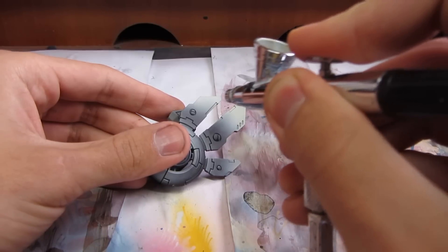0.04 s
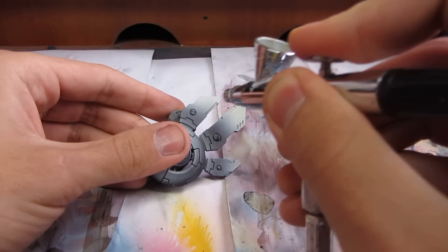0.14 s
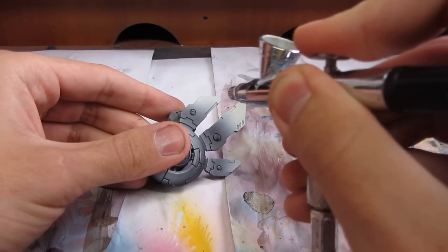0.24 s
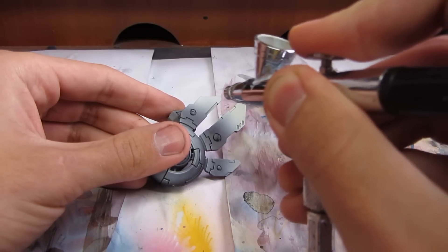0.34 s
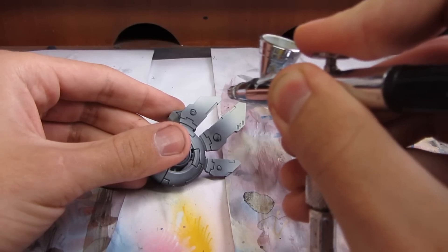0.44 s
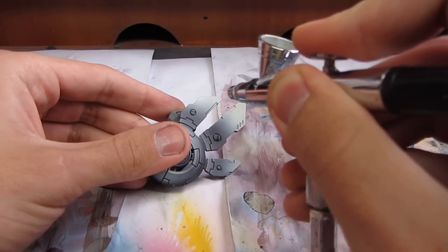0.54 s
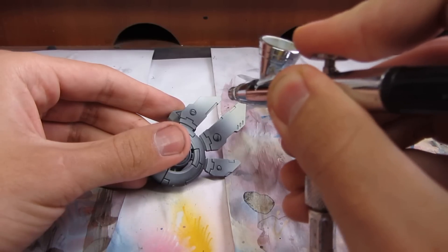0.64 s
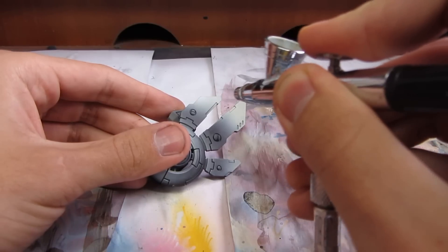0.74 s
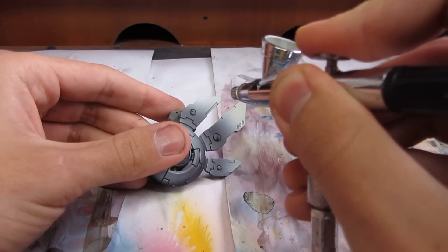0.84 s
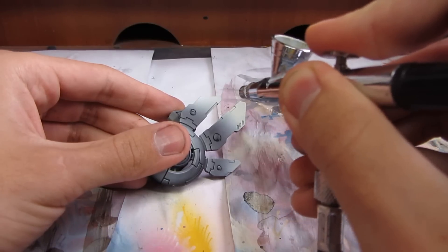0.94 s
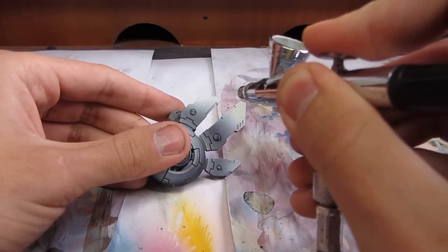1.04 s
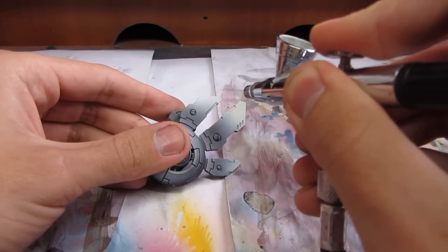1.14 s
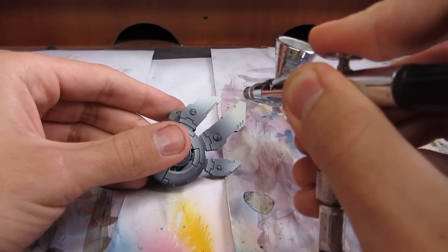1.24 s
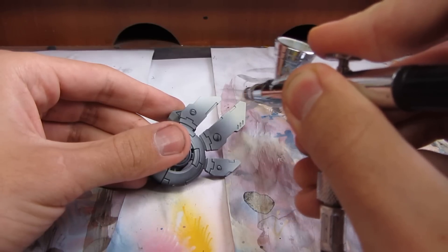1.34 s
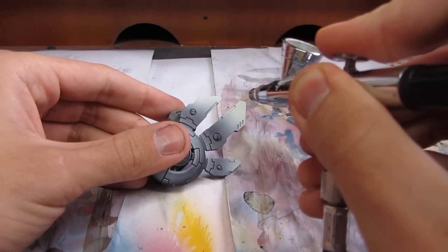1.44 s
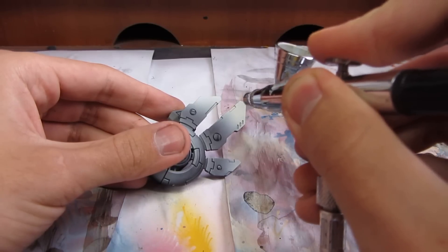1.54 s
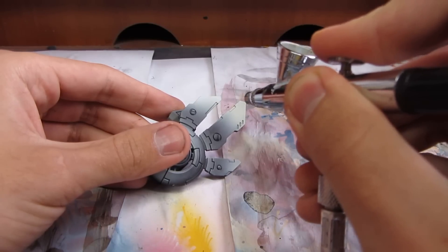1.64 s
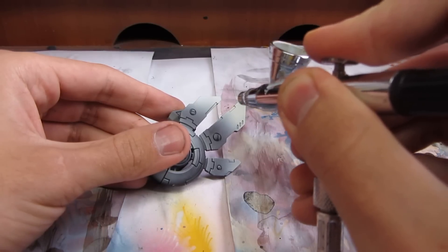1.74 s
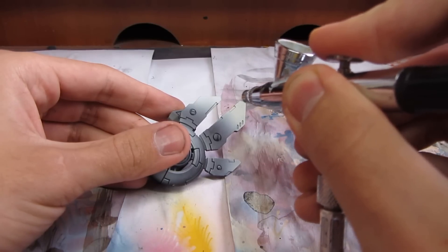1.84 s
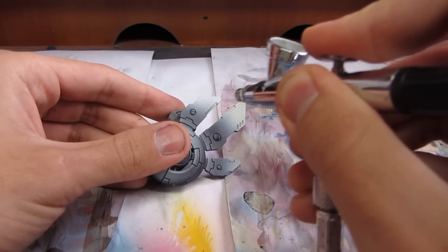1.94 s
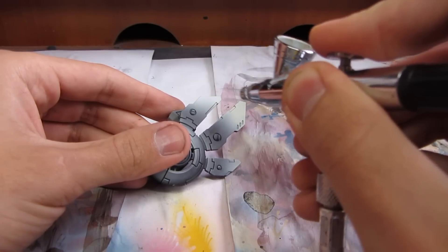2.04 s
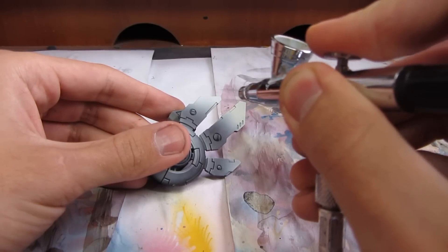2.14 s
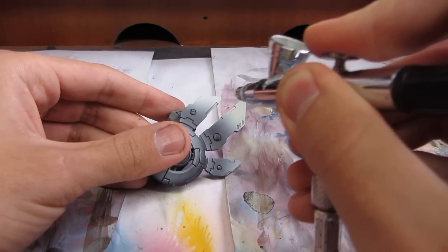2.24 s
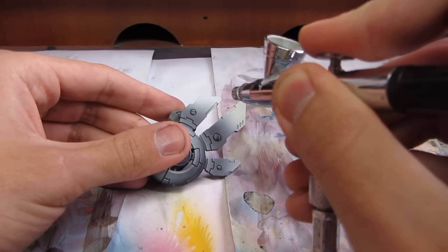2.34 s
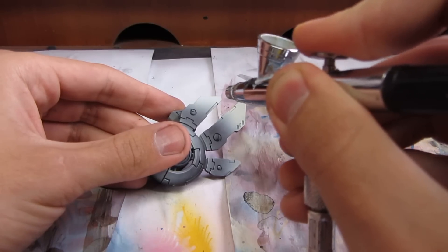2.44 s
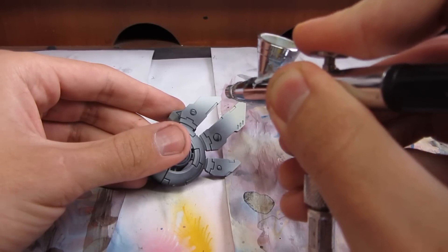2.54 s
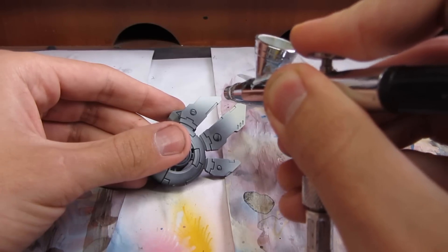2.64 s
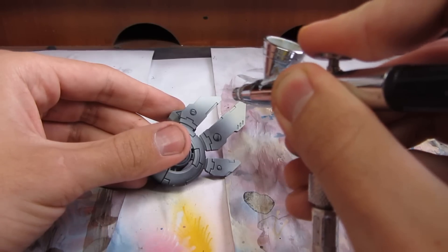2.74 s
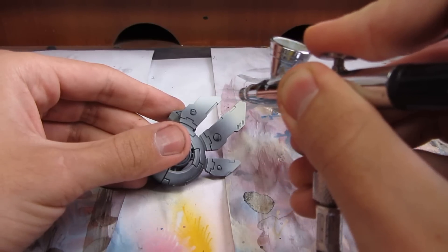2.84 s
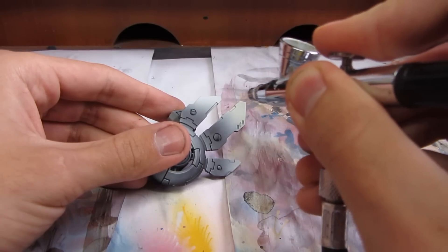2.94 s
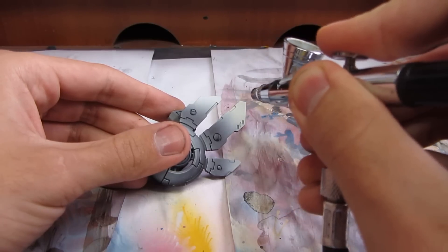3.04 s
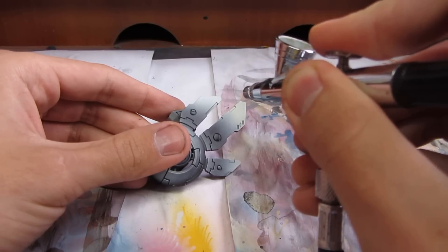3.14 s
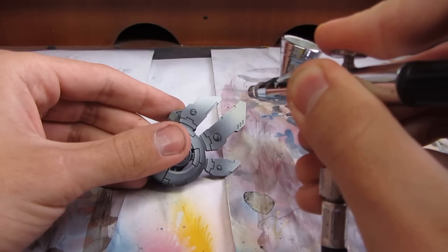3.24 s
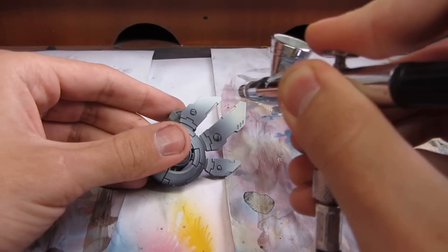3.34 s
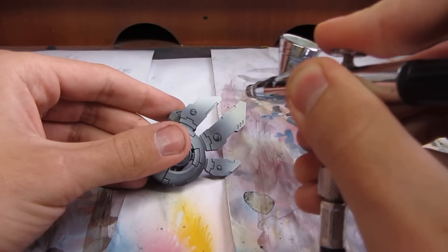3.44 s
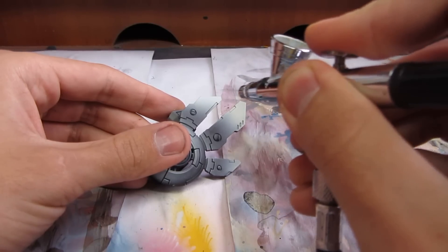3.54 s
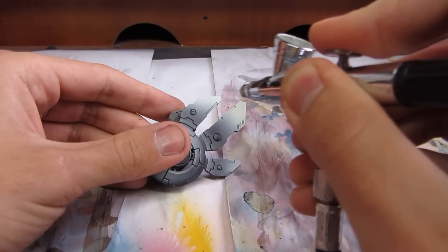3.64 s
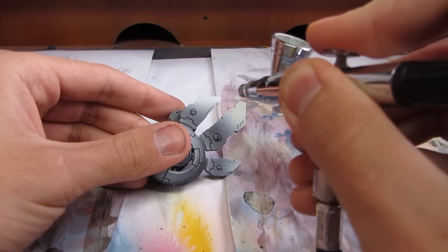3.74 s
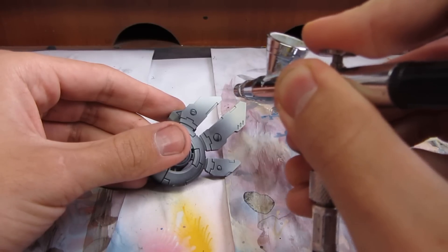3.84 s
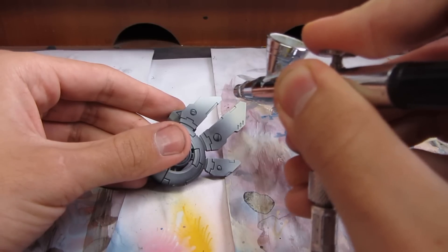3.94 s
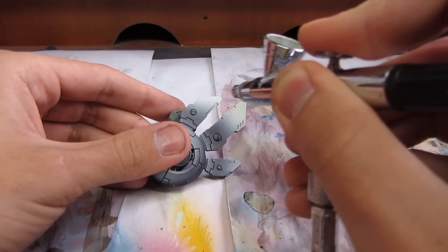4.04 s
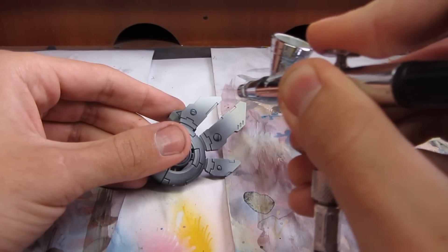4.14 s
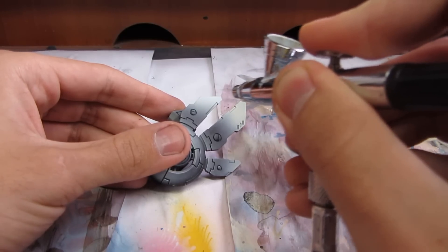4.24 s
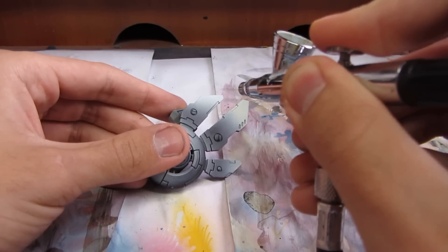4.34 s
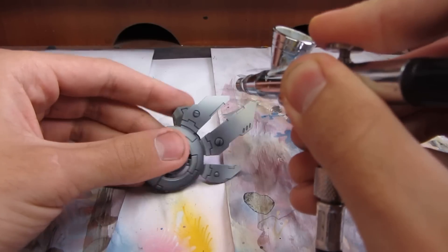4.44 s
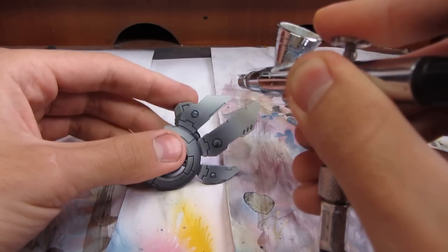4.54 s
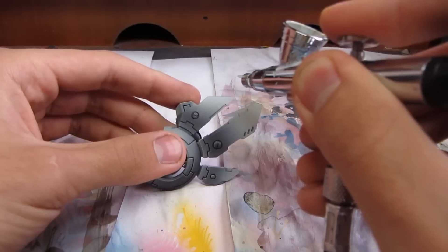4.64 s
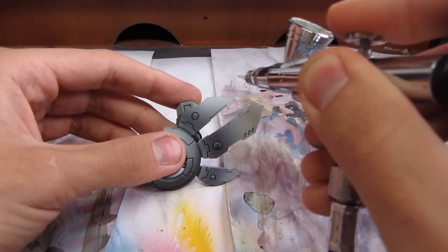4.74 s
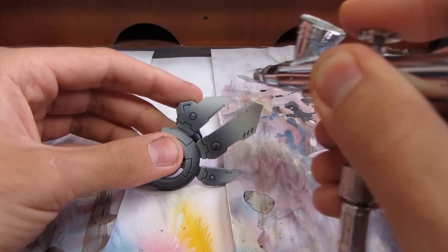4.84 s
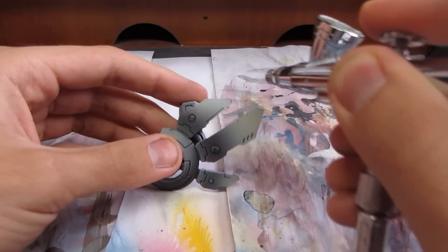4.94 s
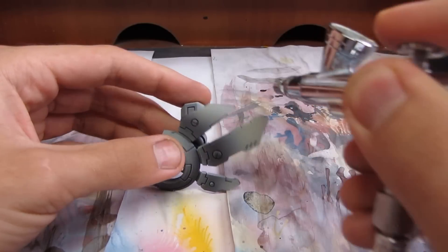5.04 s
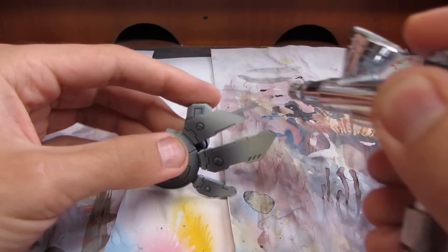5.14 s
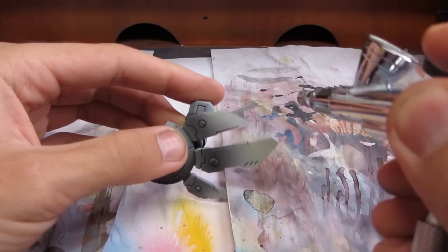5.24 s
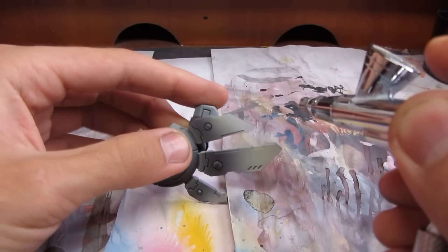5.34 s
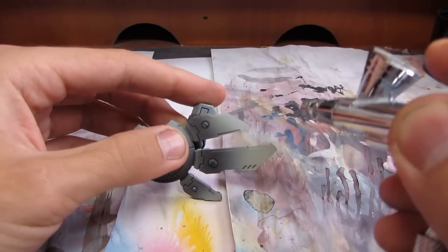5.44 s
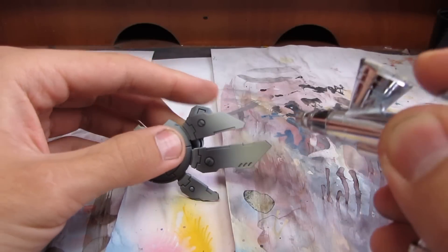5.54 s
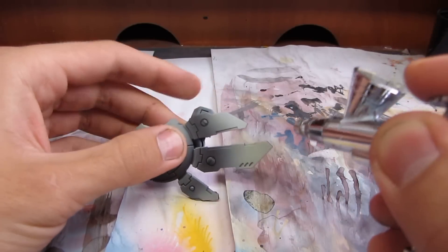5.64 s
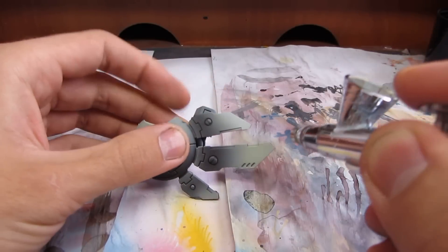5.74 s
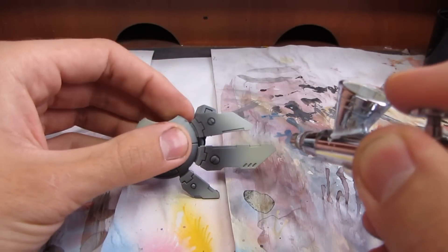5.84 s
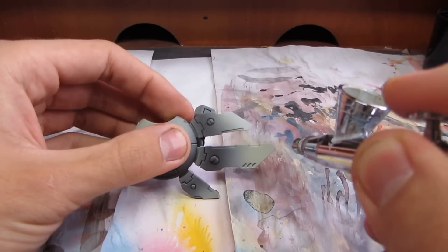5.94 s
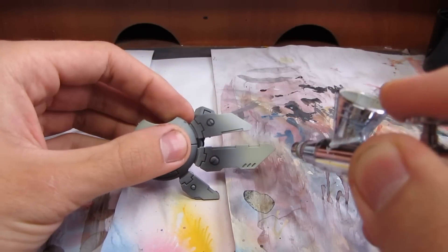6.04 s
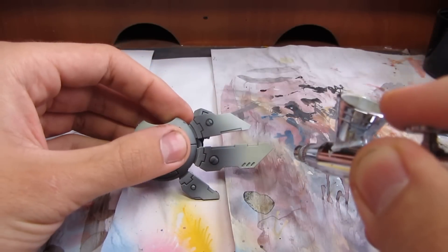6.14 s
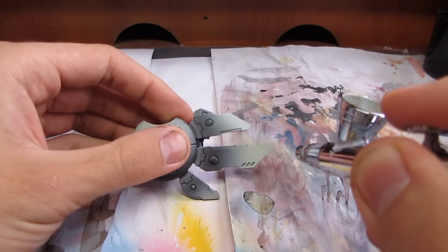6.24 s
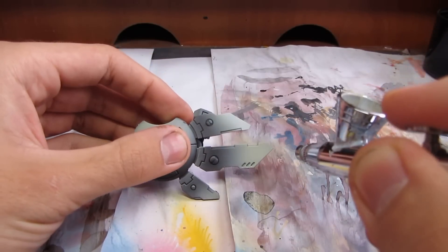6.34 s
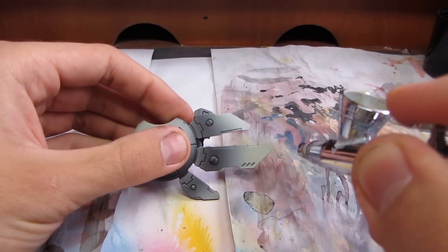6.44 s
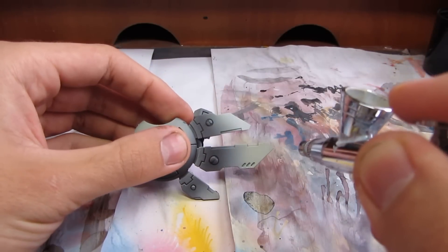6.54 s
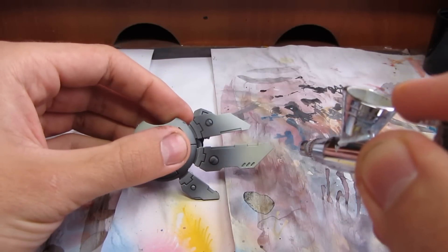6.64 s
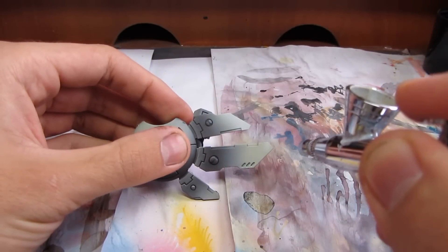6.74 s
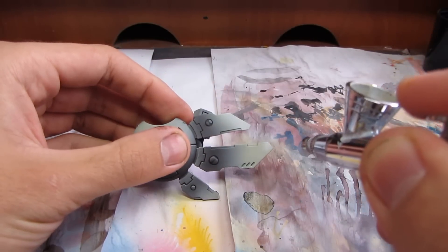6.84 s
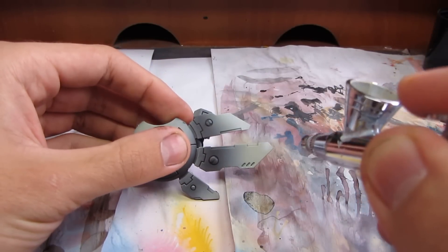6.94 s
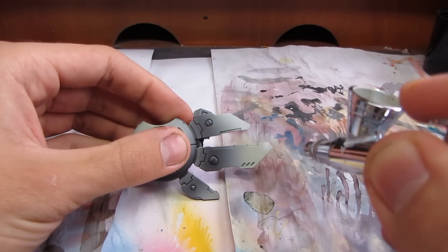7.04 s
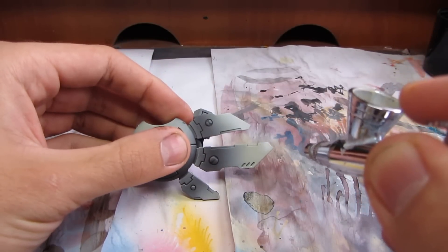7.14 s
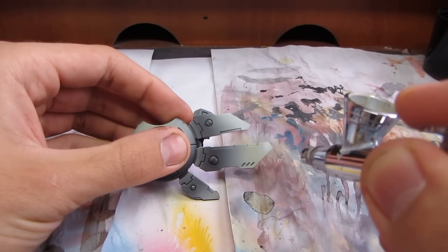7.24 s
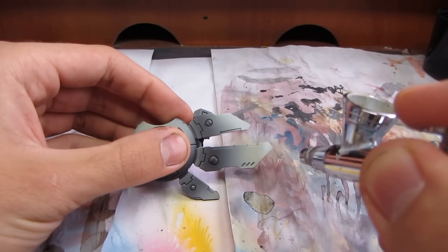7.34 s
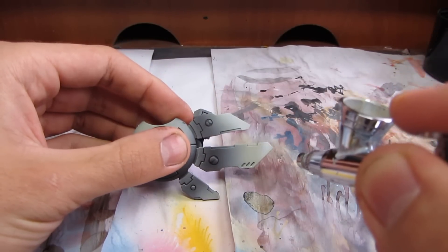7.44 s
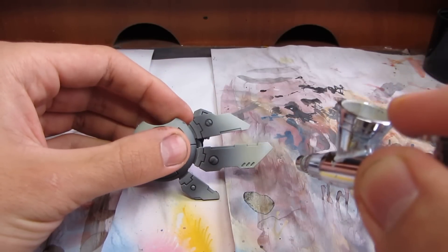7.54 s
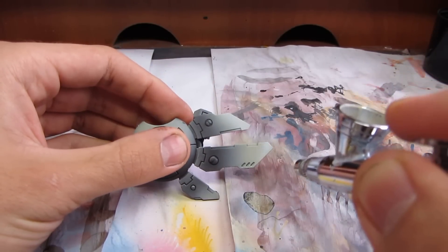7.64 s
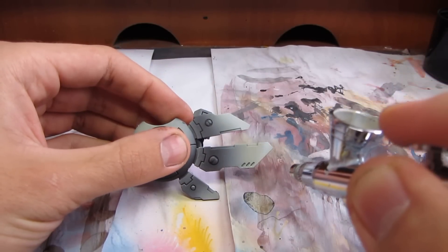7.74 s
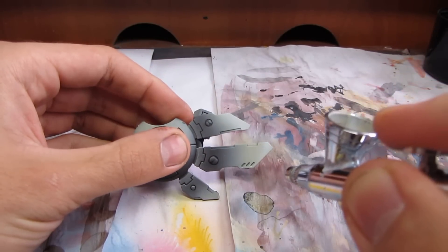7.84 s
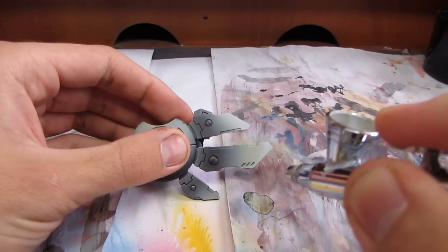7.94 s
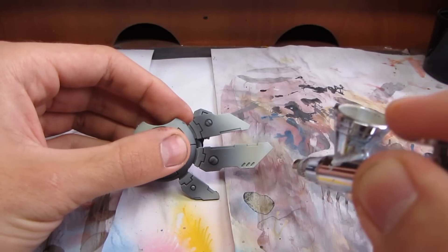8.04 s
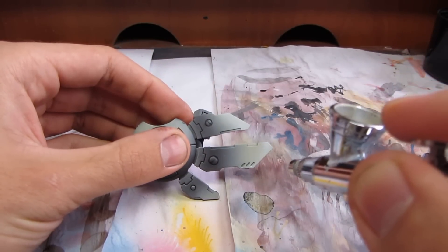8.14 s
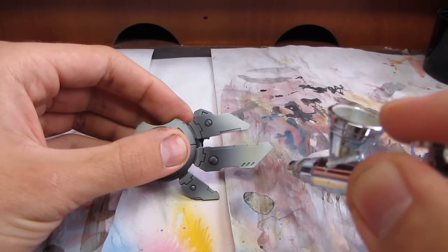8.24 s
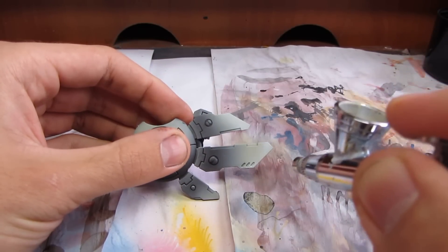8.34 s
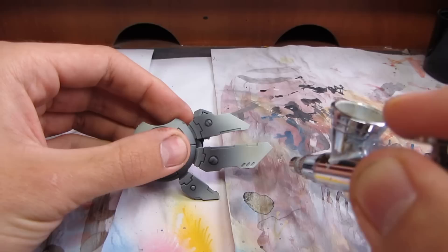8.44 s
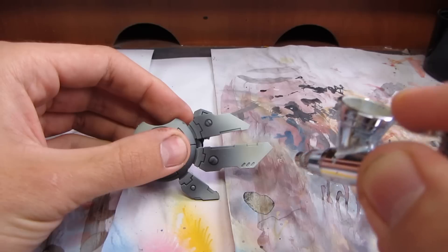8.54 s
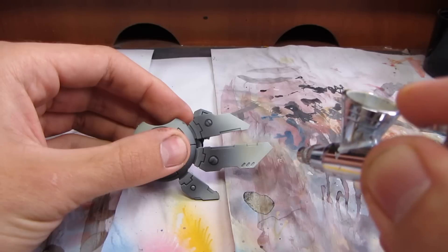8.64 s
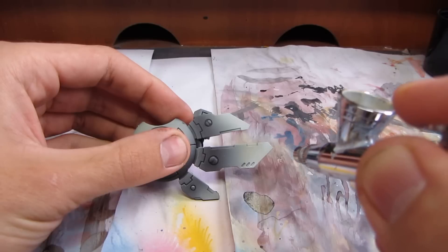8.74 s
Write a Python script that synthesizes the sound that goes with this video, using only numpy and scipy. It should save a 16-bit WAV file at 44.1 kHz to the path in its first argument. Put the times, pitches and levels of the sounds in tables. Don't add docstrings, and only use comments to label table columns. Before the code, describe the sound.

Two long bursts of sharp, unsteady compressed-air spray, split by a short quiet pause with faint handling rustles, nail ticks and low room hum.

```python
import sys
import numpy as np
from scipy import signal
from scipy.fft import rfft, irfft, next_fast_len
from scipy.io import wavfile
from scipy.ndimage import uniform_filter1d

SR = 44100
rng = np.random.default_rng(int(sys.argv[2]) if len(sys.argv) > 2 else 0)


def amp(db):
    return 10 ** (np.asarray(db, float) / 20)


def write(x):
    x = np.atleast_2d(x).T
    wavfile.write(sys.argv[1], SR, np.round(np.clip(x, -1, 1) * 32767).astype(np.int16))


N = 387638
T = np.arange(N) / SR
M = next_fast_len(N)
HZ = np.maximum(np.fft.rfftfreq(M, 1 / SR), 1)


def read(table, hz):
    table = np.array(table)
    return np.interp(np.log(hz), np.log(table[:, 0]), table[:, 1])


def unit(x):
    return x / np.sqrt(np.mean(x ** 2))


def walk(rate):
    k = int(SR / rate)
    steps = np.repeat(rng.standard_normal(N // k + 1), k)
    return unit(uniform_filter1d(uniform_filter1d(steps, k), k)[:N])


def bumps(s, length):
    return np.exp(-(2 * (T - s[:, None]) / length[:, None]) ** 2)


def causal(db, size=2048):
    cepstrum = irfft(np.log(amp(db)), size)
    cepstrum[..., 1:size // 2] *= 2
    cepstrum[..., size // 2 + 1:] = 0
    return irfft(np.exp(rfft(cepstrum)), size)


# frequency in Hz, level in dB per Hz.
JET_COLOUR = [
    [(150.0, -32.3), (300.0, -27.2), (600.0, -19.5), (1000.0, -14.4), (1500.0, -4.6), (2500.0, 0.0),
     (4000.0, -17.6), (6000.0, -8.4), (8500.0, -23.3), (11000.0, -19.9), (12500.0, -28.6), (15700.0, -23.4)],
    [(150.0, -30.9), (300.0, -21.8), (600.0, -18.5), (1000.0, -14.7), (1500.0, -0.3), (2500.0, -7.4),
     (4000.0, -7.6), (6000.0, 0.0), (8500.0, -18.5), (11000.0, -27.4), (12500.0, -31.4), (15700.0, -26.9)],
]
# centre in Hz, width in Hz, peak or notch in dB, left minus right in dB.
FIRST_REFLECTIONS = [(330.0, 90.0, -1.5, -1.4), (760.0, 90.0, -0.2, -3.3), (1060.0, 170.0, -3.9, 5.7),
                     (1150.0, 140.0, -5.9, -6.8), (1800.0, 180.0, 3.1, 7.2), (1910.0, 580.0, -14.5, -4.5),
                     (1895.0, 70.0, -6.0, 0.0), (2290.0, 170.0, 1.5, 0.0), (2560.0, 290.0, -8.2, -3.8),
                     (2880.0, 160.0, -5.2, -0.0), (3180.0, 100.0, -0.8, -6.0), (3580.0, 300.0, 5.0, 3.4),
                     (4160.0, 110.0, -0.8, 5.1), (4630.0, 370.0, 5.6, 2.3), (5120.0, 900.0, -13.2, -1.7),
                     (5440.0, 360.0, 6.9, 4.2), (5810.0, 390.0, -14.3, -0.1), (6620.0, 130.0, -1.6, 3.5),
                     (6920.0, 220.0, -3.5, -1.9), (8350.0, 800.0, 8.6, -3.4), (9350.0, 900.0, 5.2, 4.3),
                     (10010.0, 310.0, 4.2, 0.8), (11750.0, 650.0, -6.7, 2.1), (15490.0, 370.0, -11.1, 11.9)]
# centre in Hz, width in Hz, height in dB, left minus right in dB.
TURNED_REFLECTIONS = [(320.0, 210.0, -6.3, -1.7), (1070.0, 230.0, -15.9, 10.7), (1110.0, 340.0, 8.8, -11.3),
                      (1350.0, 150.0, 1.2, 0.0), (1690.0, 410.0, -15.9, 9.0), (1700.0, 90.0, -4.0, 0.0),
                      (1790.0, 170.0, 2.3, -10.0), (1920.0, 150.0, 2.3, 7.5), (1980.0, 610.0, -3.2, -11.9),
                      (2680.0, 360.0, -3.8, 5.8), (3030.0, 230.0, 2.1, 0.8), (3240.0, 190.0, -3.1, 3.2),
                      (3620.0, 460.0, -4.6, -4.2), (4240.0, 250.0, -1.1, -9.0), (4410.0, 900.0, -11.0, 3.5),
                      (5290.0, 490.0, -8.8, 11.4), (5480.0, 710.0, -6.8, -11.4),
                      (5930.0, 310.0, -15.9, 11.9), (6200.0, 400.0, -9.9, -1.7),
                      (6870.0, 640.0, -11.3, 3.9), (7610.0, 610.0, -4.2, 1.6), (9370.0, 160.0, -5.2, -7.2),
                      (13580.0, 900.0, 6.2, -1.5), (15550.0, 780.0, -9.7, -11.9)]
RIGHT_LEAD_US = [-2, 15]


def paths(pose):
    hz = np.maximum(np.fft.rfftfreq(2048, 1 / SR), 1)
    reflections = (FIRST_REFLECTIONS, TURNED_REFLECTIONS)[pose]
    centre, width, db, pan_db = np.transpose(reflections)
    shape = 1 / (1 + (2 * (hz[:, None] - centre) / width) ** 2)
    colour = read(JET_COLOUR[pose], hz)
    both = np.array([colour + shape @ (db + side * pan_db / 2) for side in (1, -1)])
    lead = np.exp(np.array([[-1j], [1j]]) * np.pi * HZ * RIGHT_LEAD_US[pose] / 10 ** 6)
    return rfft(causal(both), M) * lead


# frequency in Hz, level in dB per Hz.
SCATTER = [
    [(300.0, -34.1), (600.0, -35.9), (1000.0, -30.5), (1550.0, -32.8), (2000.0, -23.1), (2900.0, -23.3),
     (3900.0, -25.6), (5000.0, -24.5), (6300.0, -20.9), (7300.0, -23.5), (8600.0, -24.0), (10500.0, -26.8),
     (12500.0, -30.3), (15700.0, -29.7)],
    [(300.0, -34.6), (600.0, -37.0), (1000.0, -31.6), (1550.0, -28.8), (2000.0, -24.1), (2900.0, -24.2),
     (3900.0, -27.6), (5000.0, -24.4), (6300.0, -23.9), (7300.0, -23.7), (8600.0, -24.5), (10500.0, -27.8),
     (12500.0, -31.6), (15700.0, -32.9)],
]
# centre in Hz, width in Hz.
HAND_NOTCHES = [
    [(4920, 380), (5770, 320)],
    [(5250, 300), (5900, 200)],
]


def turbulence(pose, shadow):
    direct = rfft(rng.standard_normal(M)) * paths(pose)
    jet = direct + rfft(rng.standard_normal((2, M))) * amp(read(SCATTER[pose], HZ))
    shaded = sum(np.exp(-(2 * (HZ - hz) / width) ** 2) for hz, width in HAND_NOTCHES[pose])
    jet = jet - rfft(shadow * irfft(jet * shaded, M)[:, :N], M)
    return jet / np.sqrt(1 + (230 / HZ) ** 4)


# centre in seconds, change in dB, length in seconds.
SLIPS = [(0, -1.5, .06), (.06, 2.2, .07), (.155, -2, .11), (.27, 1.2, .05), (1.24, -1.5, .08),
         (1.4, 1, .08), (1.5, -6.5, .13), (2.44, 1.2, .1), (2.67, -2, .07), (2.73, 1.2, .05),
         (2.83, 1.5, .06), (3.08, -6.5, .14), (3.16, -4, .09), (3.32, -5, .08), (3.52, -3, .07),
         (3.59, 1.5, .06), (4.08, 1.2, .08), (4.31, 1.5, .07), (4.4, -1.2, .06), (6.61, 1.2, .06),
         (6.82, -1.5, .1), (6.95, 1.2, .06), (7.02, -2, .06), (7.19, -1.5, .1), (8.3, 1.2, .08),
         (8.46, -1.3, .07), (8.7, -1.2, .07)]


def aim():
    s, db, length = np.transpose(SLIPS)
    return db @ bumps(s, length)


# opens in seconds, rise in seconds, shuts in seconds, fall in seconds.
VALVE = [
    (-1, .002, 4.638, .0037),
    (6.216, .0013, 10, .004),
]
# time in seconds, air flow in dB, lean towards the desk in dB,
# turn towards the camera in dB, hand shadow from -1 to 1.
HANDS = [
    [(0, -.6, 3.3, .3, .65), (1.2, -.5, -2, .3, .1), (1.6, .3, -2.5, .8, -.9), (2.07, .4, 1, .5, .25),
     (2.7, 0, 3.5, -.9, .45), (2.86, .8, 0, -.1, .3), (3.1, -.5, -2, -1.6, .1), (3.25, -.4, -1.8, .6, .1),
     (4.45, .2, .8, .3, .55)],
    [(6.23, 1.2, 0, -.3, -.3), (6.6, .8, -1, -1.5, -.4), (6.75, -1.5, 0, -.6, -.2),
     (7.08, -1.6, .5, -1.7, -.1), (7.55, .8, -.5, 1.1, -.4), (7.82, -.5, -2, .6, .4), (8.3, 0, 1.5, 0, .45),
     (8.6, .2, 3, 0, .6), (8.79, 0, 4.5, -.8, .3)],
]
# lowest in Hz, highest in Hz.
REGIONS_HZ = [
    (350, 1000),
    (1100, 4000),
    (4500, 10500),
    (12000, 15500),
]
# desk wash, part splash, edge hiss, nozzle hiss in dB.
REGION_DB = [
    (-35, -19.9, -21.3, -33.7),
    (-34, -19, -22.8, -34.6),
]
FEELS_SLIP = (.45, 1.05, .95, .3)
FEELS_LEAN = (1.05, .1, -.15, .02)
FEELS_TURN = (0, -.25, 1.05, .5)


def burst(pose, slip, flicker_db=.6, flicker_rate=20):
    opens, rise, shuts, fall = VALVE[pose]
    when, *drifts = np.transpose(HANDS[pose])
    flow, lean, turn, shadow = (np.interp(T, when, drift) for drift in drifts)
    ease = np.clip(1 - (shuts - T) / .2, 0, 1)
    ease_db = (-1, -8, -6.5, -.2)
    jet = turbulence(pose, shadow - 2.2 * ease)
    power = np.abs(jet.mean(0)) ** 2
    out = 0
    for k, (lo, hi) in enumerate(REGIONS_HZ):
        corners = [(hz, float(j == k)) for j, pair in enumerate(REGIONS_HZ) for hz in pair]
        share = read(corners, HZ)
        inside = np.sqrt(2 * np.sum(power[(HZ > lo) & (HZ < hi)]) / M / N)
        db = REGION_DB[pose][k] + flow + ease_db[k] * ease
        db = db + FEELS_LEAN[k] * lean + FEELS_TURN[k] * turn + FEELS_SLIP[k] * slip
        flicker = flicker_db * walk(flicker_rate)
        out = out + amp(db + flicker) * irfft(jet * share, M)[:, :N] / inside
    opening = 1 + np.tanh((T - opens) / rise / 2)
    closing = 1 + np.tanh((shuts - T) / fall / 2)
    return out * opening * closing / 4


# frequency in Hz, level in dB per Hz.
BARE_JET = [(150, -25), (500, -7), (1500, 0), (3000, 0), (8000, -4), (11000, -12), (15700, -18)]


def echo(x, t60_s=.46, level_db=-22):
    flow = np.sqrt(np.abs(uniform_filter1d(x.mean(0) ** 2, 200)))
    noise = rfft(rng.standard_normal(M)) * amp(read(BARE_JET, HZ))
    jet = flow * unit(irfft(noise, M)[:N])
    tail = rng.standard_normal((2, SR // 2)) * amp(-60 * T[:SR // 2] / t60_s)
    tail = tail / np.sqrt(np.sum(tail ** 2) / 2)
    return signal.fftconvolve(jet[None], tail, axes=1)[:, :N] * amp(level_db)


# frequency in Hz, likeness from 0 to 1.
ROOM_ALIKE = [(30, .65), (130, .55), (300, .4), (1500, .2), (7000, 0)]


def air(colour):
    alike = np.clip(read(ROOM_ALIKE, HZ), -1, 1)
    noise = rfft(rng.standard_normal((2, M))) * amp(read(colour, HZ))
    mid, side = noise * np.sqrt([1 + alike, 1 - alike])
    both = irfft([mid + side, mid - side], M)[:, :N]
    return both / both.mean(0).std()


# frequency in Hz, level in dB per Hz.
ROOM_AIR = [(150, -22), (300, -1), (400, -4), (800, -9), (1500, -16), (2200, -21), (3000, -24.5),
            (4500, -29), (6000, -31.5), (9000, -39), (11500, -50), (13000, -54), (15500, -57)]
# frequency in Hz, level in dB.
HUM = [(120.5, -58), (355, -68)]


def room(swell_db=.5, wobble_db=2.5, wander_hz=3.0):
    out = air(ROOM_AIR) * amp(-44.5 + swell_db * walk(3))
    for hz, db in HUM:
        turns = np.cumsum(hz + wander_hz * walk(5)) / SR
        out = out + np.sqrt(2) * amp(db + wobble_db * walk(6)) * np.sin(2 * np.pi * turns)
    return out


# frequency in Hz, level in dB per Hz.
DEEP = [(12, -25), (25, -9), (45, -4), (75, 0), (110, -20), (300, -100)]
# frequency in Hz, level in dB per Hz.
LOW = [(30, -70), (65, -20), (100, 0), (150, -2), (210, 0), (330, -20), (900, -100)]
# centre in seconds, deep change in dB, low change in dB, length in seconds.
DRAUGHTS = [(.4, -3, 0, 1.1), (1.33, 7, 5, .15), (2.2, 5, 3, .2), (3.53, 6, 4, .12), (4.3, 4, 2.5, .7),
            (4.83, -2, -4, .15), (5.8, 3, 2, .9), (6.95, 0, -2, .4), (8.1, 0, 3, .12), (8.5, 0, 5, .2),
            (8.76, 0, 5, .3)]


def rumble(deep_pan_db=3.5, sway_db=1.2):
    s, deep_db, low_db, length = np.transpose(DRAUGHTS)
    gust = bumps(s, length)
    pan = deep_pan_db * np.array([[.5], [-.5]])
    deep = air(DEEP) * amp(-61.5 + deep_db @ gust + sway_db * walk(4) + pan)
    return deep + air(LOW) * amp(-51 + low_db @ gust + sway_db * walk(4))


# start in seconds, level in dB, pitch in Hz, 60 dB decay in seconds.
KNOCKS = [
    (.19, -32.8, 170, .39),
]


def knocks():
    out = np.zeros(N)
    for s, db, hz, t60 in KNOCKS:
        t = np.maximum(T - s, 0)
        out += amp(db - 60 * t / t60) * np.sin(2 * np.pi * hz * t) * (1 - np.exp(-t / .008))
    return out


# centre in seconds, level in dB, length in seconds, centre in Hz, width in Hz.
RUBS = [(4.94, -65, .14, 7000, 8000), (5.024, -52.5, .04, 5500, 9000), (5.07, -61, .05, 8000, 6000),
        (5.115, -57, .04, 7000, 5000), (5.15, -61, .05, 7000, 7000), (5.203, -51, .055, 4200, 9000),
        (5.252, -54, .04, 5000, 6000), (5.462, -54, .025, 9000, 9000), (5.495, -56, .06, 6000, 9000),
        (5.545, -50.5, .07, 5000, 9000), (5.6, -54.5, .035, 8500, 8000), (5.63, -57, .08, 7000, 2000),
        (5.665, -59, .06, 6000, 8000), (5.925, -61, .045, 7000, 10000), (6.209, -50, .014, 8000, 12000)]


def rubs(grain_db=3.5, alike=.3):
    out = np.zeros((2, N))
    t = T[:SR // 4] - 1 / 8
    hz_axis = np.fft.rfftfreq(len(t), 1 / SR)
    for s, db, length, hz, width in RUBS:
        skin = rng.standard_normal((3, len(t)))
        grain = np.repeat(rng.standard_normal(len(t)), 40)[:len(t)]
        skin = (alike * skin[0] + skin[1:]) * amp(grain_db * grain)
        band = 1 / (1 + (2 * (hz_axis - hz) / width) ** 2) ** 1.1
        swell = np.exp(-(2 * t / length) ** 2 * 1.3)
        k = int((s - 1 / 8) * SR)
        out[:, k:k + len(t)] += amp(db) * unit(irfft(rfft(skin) * band, len(t))) * swell
    return out


# start in seconds, level in dB, pitch in Hz.
TICKS = [
    (5.064, -52, 9000),
    (5.069, -52, 9000),
    (5.077, -52, 8800),
    (5.102, -50, 9000),
    (5.118, -49, 5700),
    (5.218, -47, 3400),
    (5.453, -48, 6500),
    (5.48, -49, 3500),
    (5.589, -47, 7000),
]


def ticks(decay_s=.0006):
    out = np.zeros((2, N))
    t = T[:SR // 100]
    for s, db, hz in TICKS:
        k = int(s * SR)
        out[:, k:k + len(t)] += amp(db) * np.sin(2 * np.pi * hz * t) * np.exp(-t / decay_s)
    return out


def scene():
    slip = aim()
    spray = amp(.6) * (burst(0, slip) + burst(1, slip))
    shut, opens = VALVE[0][2], VALVE[1][0]
    held = np.where(T < opens, np.exp(-np.maximum(T - shut, 0) / .9), 1)
    background = rumble() + room() * amp(-6 * held)
    return spray + echo(spray) + background + knocks() + rubs() + ticks()


def top_cut(x):
    return signal.sosfilt(signal.butter(12, 16480, fs=SR, output="sos"), x)


def record(dry, ceiling=1.1):
    rounded = ceiling * np.tanh(dry / ceiling)
    top = signal.ellip(12, .3, 70, 15730, fs=SR, output="sos")
    return top_cut(signal.sosfilt(top, rounded))


dry = scene()
out = record(dry)
write(out)
```